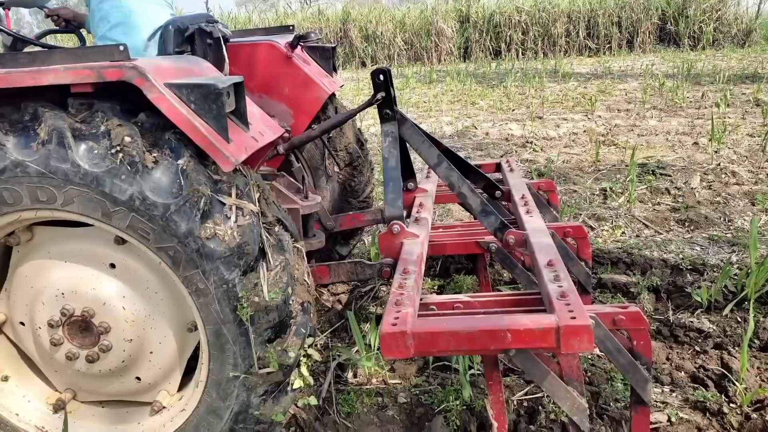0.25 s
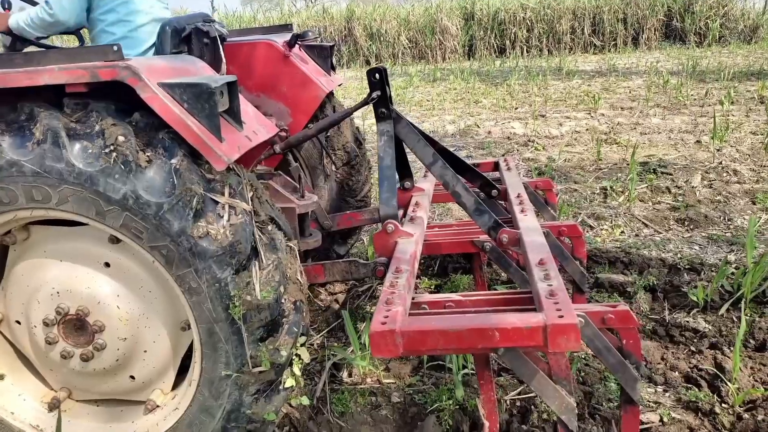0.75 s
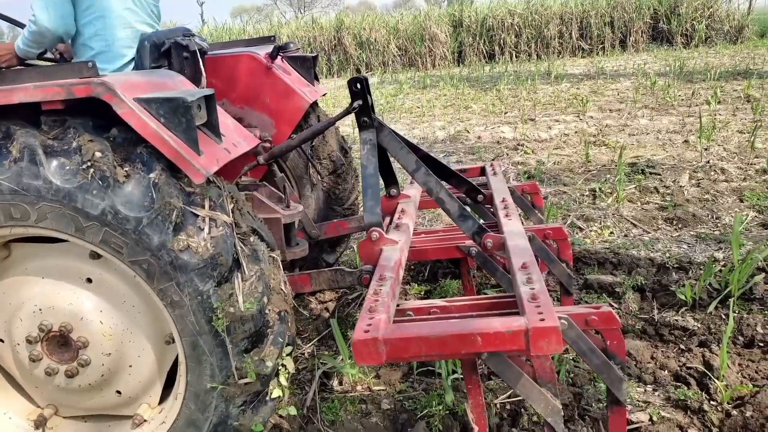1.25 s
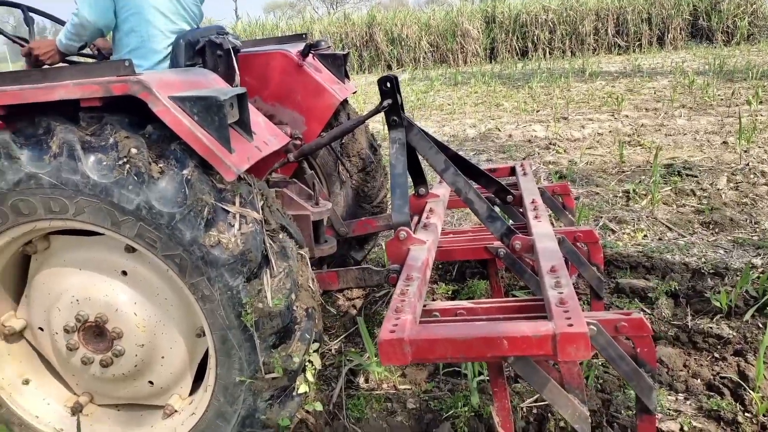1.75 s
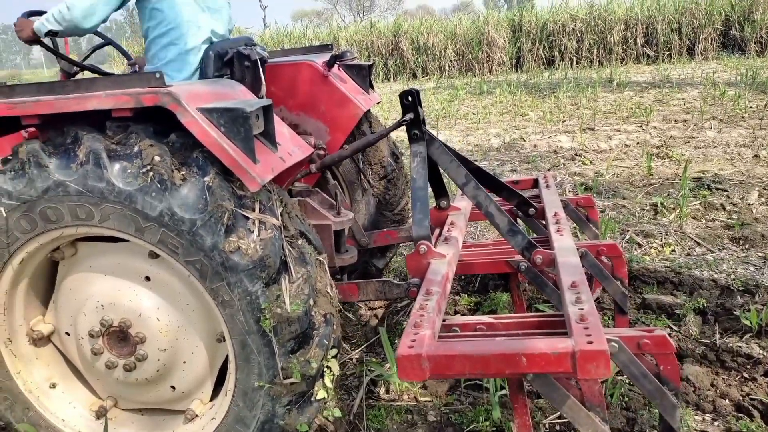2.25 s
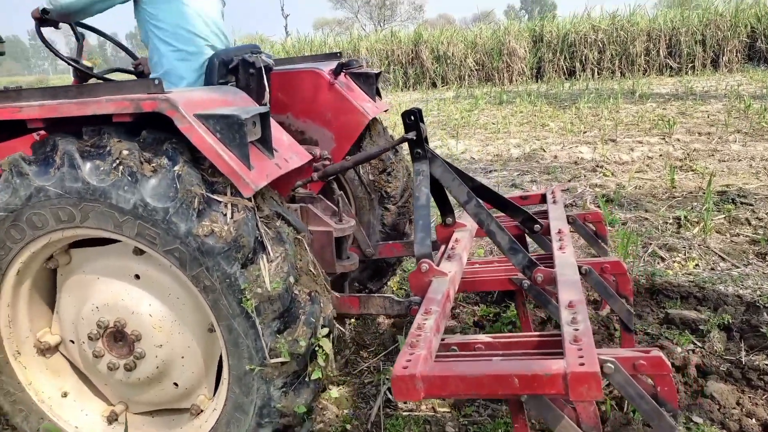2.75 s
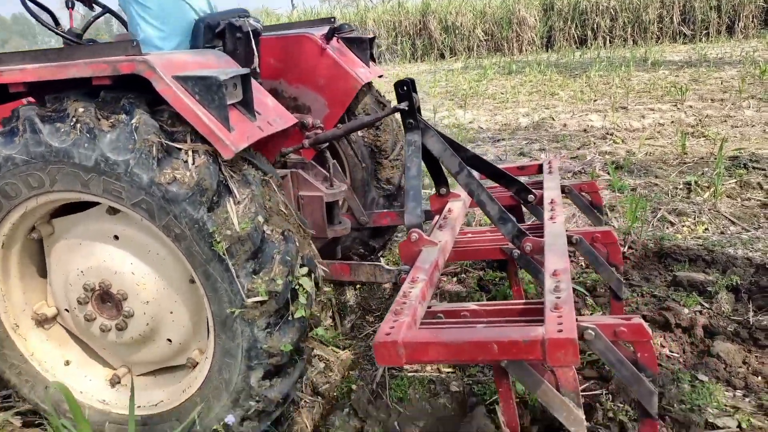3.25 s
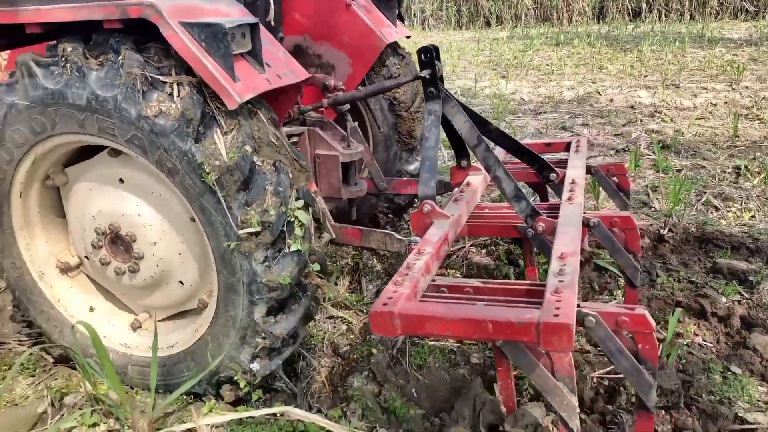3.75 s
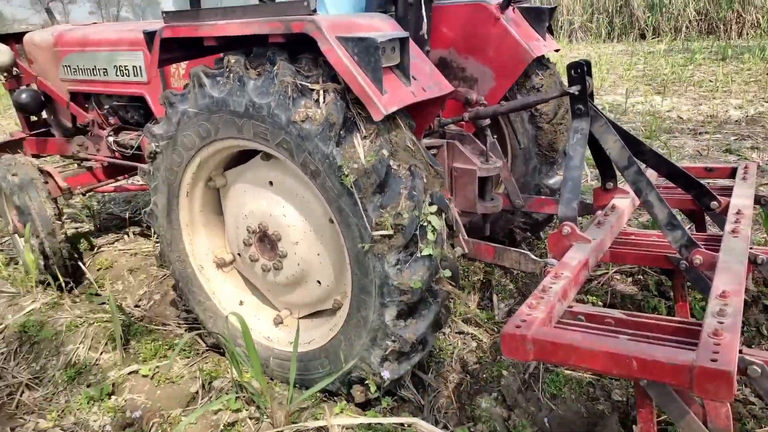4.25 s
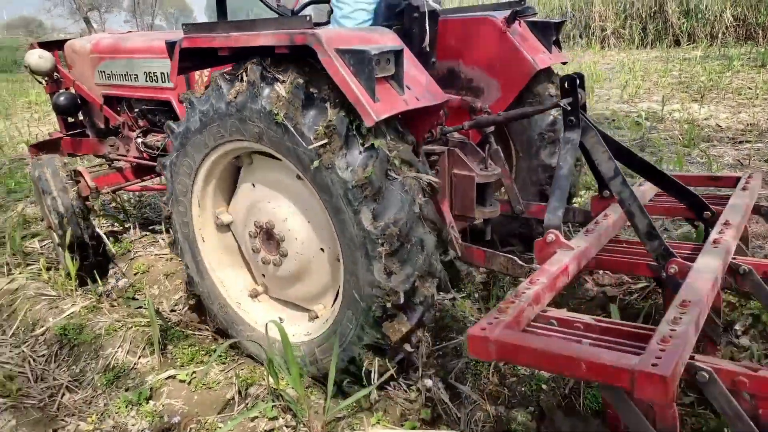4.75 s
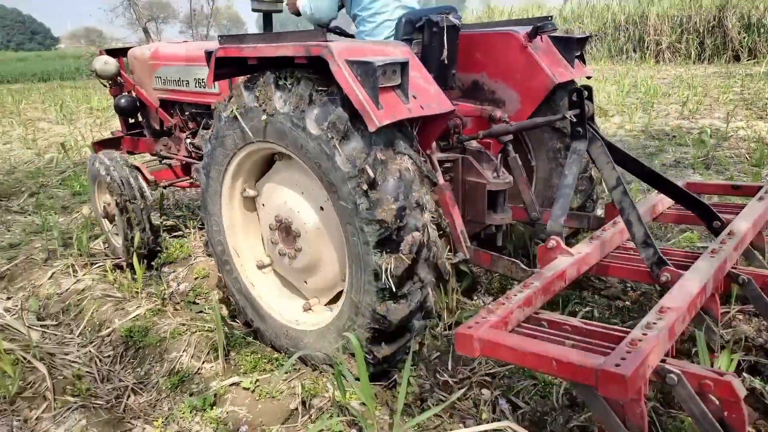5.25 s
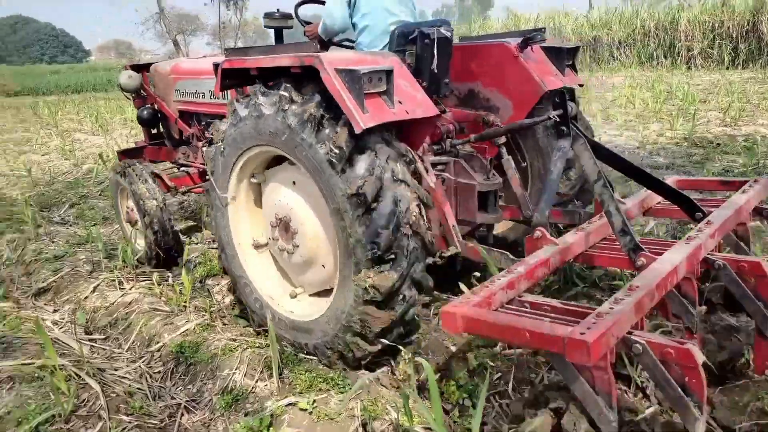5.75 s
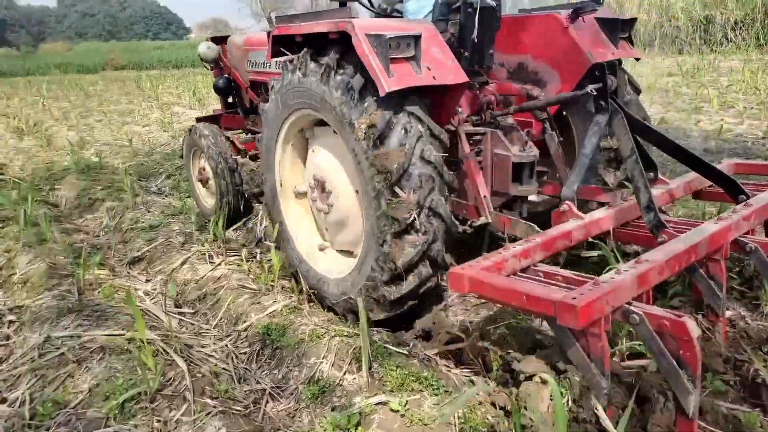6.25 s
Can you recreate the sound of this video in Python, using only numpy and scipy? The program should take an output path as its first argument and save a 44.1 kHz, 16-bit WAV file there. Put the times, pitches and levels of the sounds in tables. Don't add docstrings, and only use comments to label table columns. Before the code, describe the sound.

A diesel tractor chugs slowly at idle, stumbles and nearly stalls as tines bite the soil, then revs up into a loud, fast, roaring pull.

```python
import sys
import numpy as np
from scipy import signal
from scipy.io import wavfile

SR = 44100
rng = np.random.default_rng(int(sys.argv[2]) if len(sys.argv) > 2 else 0)


def persist_wave(psi):
    counts = np.round(np.clip(psi, -1, 1) * 32767).astype(np.int16)
    wavfile.write(sys.argv[1], SR, np.atleast_2d(counts).T)


def makeup_ratio(level_db):
    decades = np.asarray(level_db, float) / 20
    return 10 ** decades


N = 287532
TIME = np.arange(N) / SR

# pitch in Hz, width in Hz, level in dB.
BLOCK = [(327, 44, 3), (427, 33, 0), (536, 39, 0), (635.6, 50, -4.5), (980, 306, -9), (1284, 130, -12),
         (1780, 325, -5), (2294, 258, -5), (2625, 88, -10), (3090, 120, -29), (3357, 237, -20.5),
         (3930, 400, -28.5), (5700, 240, -25.5), (6015, 170, -21.5), (6660, 730, -23), (7190, 640, -22),
         (7580, 205, -8)]
# puff in dB, knock in dB, gas roar in dB, low clatter in dB, high clatter in dB.
WORK = [(-14.5, -34.5, -35.5, -42.5, -46), (-8.5, -29.5, -30.5, -44.5, -43), (-6, -31, -21, -39.5, -35),
        (-6.5, -32, -20.5, -38.5, -36.5), (-7, -32, -22.5, -38.5, -39)]


def firings():
    # how early in seconds, puff in dB, knock in dB.
    idle_cylinders = [(0, 1.6, 2.0), (.0003, .8, -5.0), (.0012, -2.4, 1.2)]
    # how early in seconds, puff in dB, knock in dB.
    pull_cylinders = [(-.0007, .8, .3), (-.0003, -.5, -.9), (0, -.3, .5)]
    # time in seconds, firings per second.
    speed = [(0, 18.558), (1.22, 18.153), (1.34, 18.164), (1.94, 17.724), (2.2, 17.161), (2.59, 12.664),
             (2.74, 16.878), (2.9, 12.713), (3.07, 15.685), (3.3, 12.834), (3.65, 15.755), (3.8, 13.786),
             (4.3, 20.275), (4.48, 19.3), (5.38, 23.219), (6.02, 26.879), (6.05, 26.136), (6.52, 25.75)]
    # time in seconds, puff loss in dB.
    starved = [(2.179, 3.5), (2.237, 4.5), (2.298, 5), (2.362, 6.5), (2.431, 4), (2.499, 8.5), (2.578, 1.5),
               (2.777, 10.5), (2.845, 8), (2.915, 10), (3.125, 0.5), (3.188, 13.5), (3.267, 2.5),
               (3.686, 2.5), (3.752, 7), (3.822, 0.5)]
    # time in seconds, knock gain in dB.
    hard_knocks = [
        (2.298, 6),
        (2.431, 7.5),
        (2.499, 4.5),
        (2.65, 5),
        (2.992, 3.5),
        (3.417, 3.5),
        (3.822, 2),
    ]
    first_turn = .513
    knock_follows = .39

    turns = np.cumsum(np.interp(TIME, *np.transpose(speed))) / SR - first_turn
    step = np.arange(int(turns[-1]) + 1)
    at = np.interp(step, turns, TIME)

    idle, pull = at_effort([(1, 0), (0, 0), (0, 1), (0, 1)], at)
    idle_habit = np.array(idle_cylinders)[step % 3].T
    pull_habit = np.array(pull_cylinders)[step % 3].T
    early, puff_habit, knock_habit = idle * idle_habit + pull * pull_habit

    puff_db, knock_db = at_effort(WORK, at)[:2]
    lost = on_nearest(starved, at)
    chance = rng.standard_normal((len(at), 2)) * [.5, .8]
    puff_db = puff_db + puff_habit - lost + chance[:, 0]
    knock_db = knock_db + knock_habit - knock_follows * np.roll(lost, -1)
    knock_db = knock_db + on_nearest(hard_knocks, at) + chance[:, 1]
    return at - early, puff_db, knock_db, lost


def exhaust(at, puff_db):
    # pitch in Hz, rise in Hz per second, length in seconds, ring share, ring decay in seconds.
    puff_shapes = [(106, 2700, .0048, .87, .021), (114, 3850, .0028, .55, .032),
                   (137, 4400, .0038, .71, .02), (153, 1600, .0028, .87, .0105)]
    # pitch in Hz, share, decay in seconds.
    breath = [(75, .78, .0147), (59, .27, .025), (60.5, .51, .0135), (69, .33, .0135)]
    # share, lead in seconds, length in seconds.
    suction = [(.46, .0109, .0011), (.29, .0056, .0027), (.84, .008, .0013), (1, .0067, .0016)]
    # pitch in Hz, level in dB, time to fall 60 dB in seconds.
    pipe = [(269, -38.5, .1), (324, -28.5, 0.033), (412, -27, 0.071), (528.5, -30, 0.22),
            (626.5, -30, 0.18)]
    # pitch in Hz, level in dB, time to fall 60 dB in seconds.
    tailpipe = [(150, -22, .18), (183, -15, .24), (205, -19, .18)]
    slosh_levels = [-6.5, 1.7, -2.3, -2, -6]
    first_levels = [7, 0, 0.5, -1, 0]
    echo_s, echo_db = .017, -17

    puffs = np.zeros(N + 8000)
    t = np.arange(-1000, 5000) / SR
    after = np.maximum(t, 0)
    for s, db in zip(at, puff_db):
        hz, rise, length, share, ring_s = at_effort(puff_shapes, s)
        boom_hz, boom, boom_s = at_effort(breath, s)
        dip, lead, dip_s = at_effort(suction, s)
        front = np.exp(-.5 * (t / length) ** 2)
        tail = np.where(t > 0, 1, front)
        turns = hz * t + .5 * rise * after ** 2 / (1 + after / .06)
        envelope = (1 - share) * front + share * tail * np.exp(-after / ring_s)
        puff = envelope * np.cos(2 * np.pi * turns)
        puff += boom * tail * np.exp(-after / boom_s) * np.cos(2 * np.pi * boom_hz * t)
        puff -= dip * np.exp(-.5 * ((t + lead) / dip_s) ** 2)
        i = round(s * SR)
        puffs[i:i + len(t)] += makeup_ratio(db + 1.9) / (1 + boom) * puff
    puffs = puffs[1000:N + 1000]
    echo = makeup_ratio(echo_db) * np.interp(TIME - echo_s, TIME, puffs, left=0)

    hard_db = puff_db + .25 * (np.minimum(puff_db, -8.5) + 19.5)
    pipe_ring = strike(at + .00298, hard_db, pipe, spread_db=2.0)

    slosh_db, first_db = at_effort(np.c_[slosh_levels, first_levels], at)
    cylinder_one = np.arange(len(at)) % 3 == 0
    late = at + .011 + .001 * rng.standard_normal(len(at))
    slosh = strike(late, puff_db + slosh_db + first_db * cylinder_one, tailpipe, spread_db=3.5)
    return puffs + echo + pipe_ring + slosh


def knock(at, puff_db, knock_db, per_s):
    # firings per second, delay after the puff in seconds, change in dB.
    knock_delay = [(14.165, .0085, -0.5), (17.25, .0065, -2.5), (20.29, 0.0057, -2), (26.05, 0.0013, -9)]
    # pitch in Hz, width in Hz, level in dB.
    cover_tones = [(431, 37, 0), (548, 80, -3.5), (1042, 110, -3), (1380, 95, -11.5)]
    # pitch in Hz, level in dB, time to fall 60 dB in seconds.
    panel_tones = [(1117, -9, 0.047), (1780, -10, 0.14), (1830, -13, 0.046), (2336, -1.5, 0.13),
                   (2399, -2.5, 0.064), (2560, -14, 0.032), (3280, -9.5, 0.0072), (6000, -19.5, 0.033)]

    lazy = .0006 * np.maximum(-16.5 - puff_db, 0)
    rate, delay, share_db = np.transpose(knock_delay)
    at = at + np.interp(per_s, rate, delay) + lazy
    knock_db = knock_db + np.interp(per_s, rate, share_db)

    sharp_head = burst(at, knock_db, .07)
    long_tail = burst(at, knock_db - 2.0, .162)
    grain = makeup_ratio(2.2 * drift(300))
    block = body(grain * (sharp_head + long_tail), BLOCK)
    cover = body(burst(at[::3] + .003, knock_db[::3] + 5.0, .085), cover_tones)
    panels = strike(at + .001, knock_db + .5, panel_tones, spread_db=2.5)
    return 10.72 * (block + cover) + panels


def roar(at, roar_db):
    # pitch in Hz, width in Hz, level in dB.
    silencer = [(149, 63, -3.5), (223.4, 49, -1), (308, 82, 0), (444, 79, -7), (531, 78, -10),
                (975, 268, -13.5), (1224, 274, -15.5)]
    push = rms_one(2.3 + burst(at + .004, np.zeros(len(at)), .15))
    return makeup_ratio(roar_db) * rms_one(body(push * makeup_ratio(.8 * drift(28)), silencer))


def clatter(at, low_db, high_db):
    swell = rms_one(.55 + burst(at + .0022, np.zeros(len(at)), .17))
    low = rms_one(body(makeup_ratio(2.0 * drift(100) + 1.0 * drift(6.5)), BLOCK[4:9]))
    high = rms_one(body(swell * makeup_ratio(2.0 * drift(200) + 1.0 * drift(9.7)), BLOCK[9:]))
    return makeup_ratio(low_db) * low + makeup_ratio(high_db) * high


def whine(at):
    # teeth per firing, level in dB.
    teeth = [(41.3, 0), (19.9, -1), (82.6, -17)]
    # time in seconds, level in dB, half length in seconds.
    swells = [
        (5.54, -27, .18),
        (6.4, -30.5, .16),
    ]
    flutter_hz = 13.0
    turns = np.interp(TIME, at, np.arange(len(at)))
    throb = 1 + .35 * np.cos(2 * np.pi * turns) + .25 * drift(flutter_hz)
    tones = np.zeros(N)
    for order, db in teeth:
        tones += makeup_ratio(db) * np.sin(2 * np.pi * order * turns + .9 * drift(flutter_hz))
    loudness = sum(makeup_ratio(db) * np.exp(-.5 * ((TIME - s) / length) ** 2) for s, db, length in swells)
    return loudness * throb * tones


def clinks():
    # time in seconds, peak in dB, pitch in Hz, length in seconds.
    rubs = [
        (2.342, -26, 1140, .009),
        (2.389, -22, 1130, .005),
        (2.455, -34, 1080, .005),
        (2.495, -34, 1100, .004),
        (5.135, -20, 7480, .004),
    ]
    rough = 1.1 * drift(90)
    out = np.zeros(N)
    for s, db, hz, length in rubs:
        swell = np.exp(-.5 * ((TIME - s) / length) ** 2)
        out += makeup_ratio(db) * swell * np.sin(2 * np.pi * hz * TIME + rough)
    return out


def at_effort(rows, s):
    # time in seconds, effort.
    effort_steps = [
        (2.4, 0),
        (2.6, 1),
        (3.9, 1),
        (4.2, 1.62),
        (4.45, 2),
        (5.0, 2.5),
        (5.5, 2.5),
        (5.75, 3),
        (6.05, 4),
    ]
    effort = np.interp(s, *np.transpose(effort_steps))
    return [np.interp(effort, np.arange(len(rows)), column) for column in np.transpose(rows)]


def on_nearest(rows, at):
    out = np.zeros(len(at))
    for s, db in rows:
        out[np.argmin(abs(at - s))] = db
    return out


def burst(at, level_db, t60):
    strikes = np.zeros(N + SR)
    strikes[np.round(at * SR).astype(int)] = makeup_ratio(level_db)
    rise = np.exp(-1 / (.0009 * SR))
    fall = makeup_ratio(-60 / (t60 * SR))
    return signal.lfilter([1 - rise], np.convolve([1, -rise], [1, -fall]), strikes + 1e-18)[:N]


def strike(at, level_db, modes, spread_db):
    out = np.zeros(N)
    index = np.minimum(np.round(at * SR).astype(int), N - 1)
    for hz, db, t60 in modes:
        clicks = np.zeros(N)
        clicks[index] = makeup_ratio(level_db + db + spread_db * rng.standard_normal(len(at)))
        out += ring(clicks, hz, t60)
    return out


def ring(clicks, hz, t60):
    r = makeup_ratio(-60 / (t60 * SR))
    w = 2 * np.pi * hz / SR
    return signal.lfilter([0, np.sin(w)], [1, -2 * r * np.cos(w), r * r], clicks + 1e-18)


def body(shake, modes):
    white = rng.standard_normal((2, N)) * shake
    out = np.zeros(N)
    for k, (hz, width, db) in enumerate(modes):
        wide = 1.46 * width
        once = resonance(white[k % 2], hz, wide)
        out += makeup_ratio(db) * resonance(once, hz, wide)
    return out


def resonance(x, hz, width_hz):
    r = np.exp(-np.pi * width_hz / SR)
    feedback = [1, -2 * r * np.cos(2 * np.pi * hz / SR), r * r]
    return signal.lfilter((1 - r * r) / 2 * np.array([1, 0, -1]), feedback, x)


def drift(hz):
    r = np.exp(-2 * np.pi * hz / SR)
    smooth = signal.lfilter([1], [1, -2 * r, r * r], rng.standard_normal(N + SR))
    return rms_one(smooth[SR:])


def rms_one(x):
    return x / np.sqrt(np.mean(x ** 2) + 1e-20)


def scene():
    at, puff_db, knock_db, lost = firings()
    per_s = 1 / np.gradient(at)
    roar_db, low_db, high_db = at_effort(WORK, TIME)[2:]
    roar_db = roar_db - .3 * np.interp(TIME, at, lost)
    onward = np.append(at, 2 * at[-1] - at[-2])
    engine = exhaust(at, puff_db) + knock(at, puff_db, knock_db, per_s) + whine(onward)
    mix = engine + clatter(at, low_db, high_db) + roar(at, roar_db) + clinks()
    return mix[None]


def roll_off(x):
    return signal.sosfilt(signal.butter(12, 8470, fs=SR, output="sos"), x)


def record(dry):
    rumble_cut_hz, treble_cut_hz = 42, 7700
    no_rumble = signal.butter(3, rumble_cut_hz, "high", fs=SR, output="sos")
    no_top = signal.cheby2(20, 62, treble_cut_hz * 1.01, fs=SR, output="sos")
    x = signal.sosfiltfilt(no_rumble, dry)
    rounded = .9 * np.tanh(x / .9)
    return roll_off(signal.sosfilt(no_top, rounded))


dry = scene()
out = record(dry)
persist_wave(out)
```